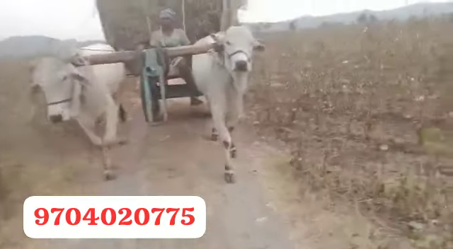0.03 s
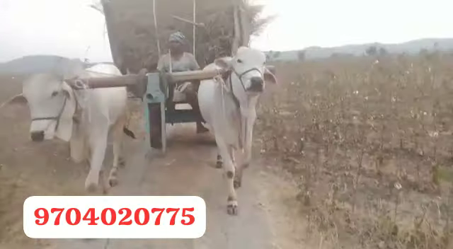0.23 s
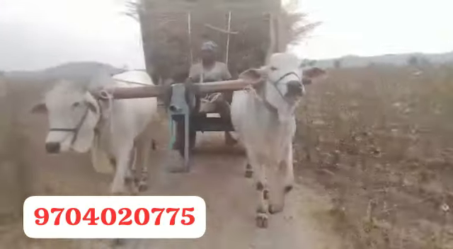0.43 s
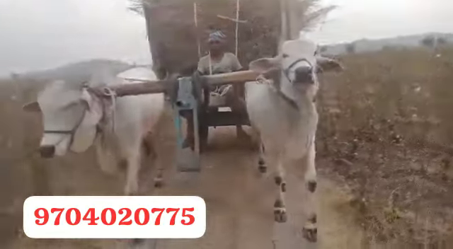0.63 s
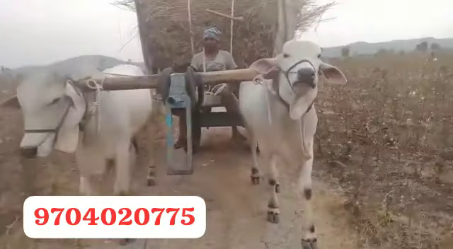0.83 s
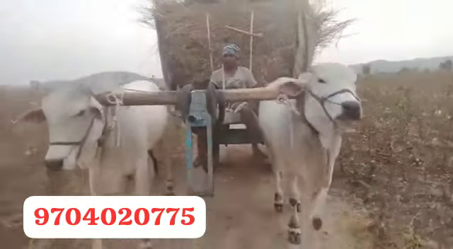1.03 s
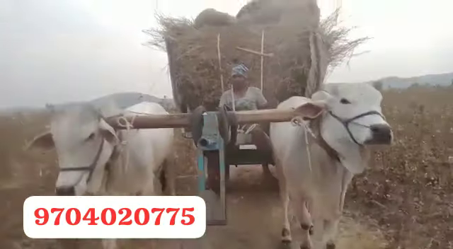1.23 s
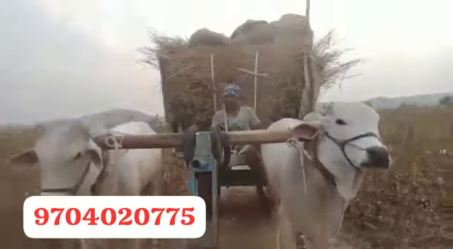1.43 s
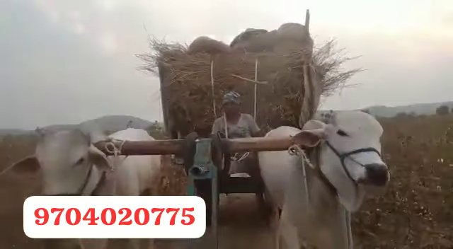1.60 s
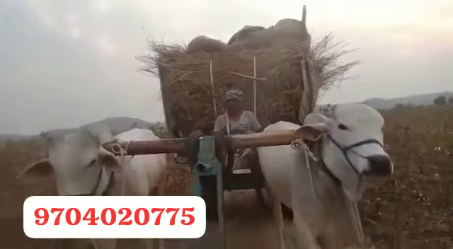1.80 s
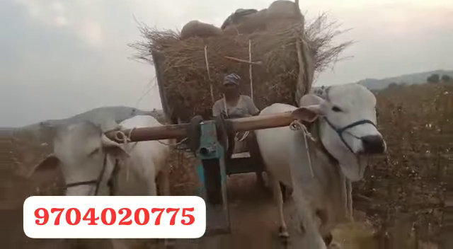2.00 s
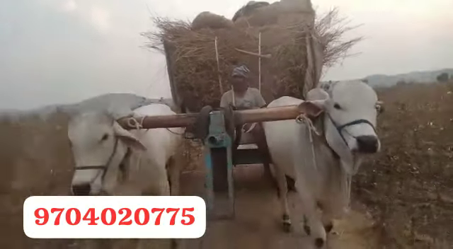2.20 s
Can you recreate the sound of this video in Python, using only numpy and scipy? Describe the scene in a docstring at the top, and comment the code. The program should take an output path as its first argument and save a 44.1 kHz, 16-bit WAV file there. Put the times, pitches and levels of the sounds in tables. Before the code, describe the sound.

Two bullocks walk on a dirt track, hooves crunching dry soil and clicking small stones, straw swishing on their cart; from about half a second wind thumps and rumbles loudly on the close microphone, outdoors without echo.

```python
"""Dirt track in the open: two bullocks pull a straw-laden cart close by.
Hooves crunch and scuff as bursts of soil grains; small stones click as short damped tones with noise.
The load hisses as coloured grains, the harness clinks as ringing modes, the cart creaks once in narrow noise.
Gusts buffet the microphone, loudest of all: a lumpy low rumble of banded noise plus single pressure pulses."""
import sys
import numpy as np
from scipy import signal
from scipy.fft import rfft, irfft
from scipy.io import wavfile
from scipy.ndimage import uniform_filter1d

SR = 44100
rng = np.random.default_rng(int(sys.argv[2]) if len(sys.argv) > 2 else 0)


def master_out(mix):
    """Clip the mix to full scale and print it as 16-bit PCM to the path in sys.argv[1]."""
    frames = np.transpose(np.atleast_2d(mix))
    ceiling = np.clip(frames, -1, 1)
    pcm = np.round(ceiling * 32767).astype(np.int16)
    wavfile.write(sys.argv[1], SR, pcm)


N = 99313
TIME = np.arange(N) / SR
HZ = np.maximum(np.fft.rfftfreq(N, 1 / SR), 1)


def from_db(db):
    """Decibels to gain."""
    return 10 ** (np.asarray(db) / 20)


def rms_one(x):
    """Scale to unit power."""
    return x / np.sqrt(np.mean(x ** 2) + 1e-20)


def in_time(rows):
    """Each column of a curve, interpolated at every sample."""
    s, *columns = np.transpose(rows)
    return [np.interp(TIME, s, c) for c in columns]


def colour(points):
    """Gain at every frequency from (Hz, dB) points, interpolated over log frequency."""
    hz, db = np.transpose(points)
    return from_db(np.interp(np.log(HZ), np.log(hz), db))


def hump(hz, octaves):
    """Gain of a broad resonance: Gaussian over octaves."""
    return np.exp(-.5 * (np.log2(HZ / hz) / octaves) ** 2)


def shaped(x, gain):
    """Steady excitation with a given colour; rms 1."""
    return rms_one(irfft(rfft(x) * gain, N))


def white():
    """White noise."""
    return rng.standard_normal(N)


def evened(x, seconds, share):
    """Take a share of the slow chance swings out of a noise; rms 1."""
    power = uniform_filter1d(np.abs(signal.hilbert(x)) ** 2, max(int(seconds * SR), 1))
    swing = (np.abs(power) + 1e-9) ** (np.clip(share, 0, 1) / 2)
    return rms_one(x / swing)


def grains(per_s, spread_db):
    """Random clicks of uneven size and either sign."""
    sizes = from_db(spread_db * np.minimum(rng.exponential(1, N), 4))
    signs = rng.choice([-1, 1], N)
    return sizes * signs * (rng.random(N) < per_s / SR)


def blow(s, attack_s, decay_s):
    """Quick linear rise, then exponential decay."""
    age = TIME - s
    rise = np.clip(age / attack_s, 0, 1)
    return rise * np.exp(-np.clip((age - attack_s) / decay_s, 0, 20))


def swell(s, half_s):
    """Bell-shaped rise and fall."""
    return np.exp(-.5 * np.minimum(((TIME - s) / half_s) ** 2, 100))


PORT_LOW_HZ, PORT_SLOPE = 80.6, 4   # bass corner, filter order


def port(hz):
    """Bass roll-off of the microphone: it passes no deep bass."""
    return 1 / np.sqrt(1 + (PORT_LOW_HZ / hz) ** (2 * PORT_SLOPE))


EDDY_STEEPNESS = 1.3   # exponent of the fall with frequency


def eddy(hz, reach_hz):
    """Turbulence spectrum at the port: no deep bass, and a fast fall above its reach."""
    return np.exp(-(hz / reach_hz) ** EDDY_STEEPNESS) * port(hz)


WIND_TRIM_DB, WIND_EVEN_S, WIND_EVENNESS = 1.5, 0.051, 0.89
# Wind on the microphone: [t/s, level before trim/dB, turbulence reach f/Hz]
WIND = [(0, -49.5, 77.6), (.27, -58, 82.2), (.42, -51, 66.3), (.55, -45, 74.8), (.62, -35.5, 165),
        (.72, -30.5, 198), (.85, -33.5, 205), (.96, -32, 148.3), (1.10, -39, 109.7), (1.22, -32.5, 164.4),
        (1.42, -41.5, 107.5), (1.54, -40.5, 167), (1.69, -42.5, 83.7), (1.79, -37.5, 115),
        (1.92, -37, 156.7), (2.09, -32.5, 193.4), (2.25, -32.5, 145)]


def wind():
    """Turbulent rumble summed from third-octave noise bands; a higher reach adds upper bands."""
    level_db, reach_hz = in_time(WIND)
    rumble, power = 0, 0
    for hz in 20 * 2 ** (np.arange(19) / 3):
        gain = eddy(hz, reach_hz) * np.sqrt(hz)   # bandwidth grows with f
        rumble = rumble + gain * shaped(white(), hump(hz, 1 / 6))
        power = power + gain ** 2
    steady = evened(rumble / np.sqrt(power), WIND_EVEN_S, WIND_EVENNESS)
    return from_db(level_db + WIND_TRIM_DB) * steady


AIR_DB = -73
# Still background spectrum: [f/Hz, relative level per Hz/dB]
AIR_COLOUR = [(200, 4), (1000, -20), (15500, -29)]


def air():
    """Still background: steady coloured noise."""
    return from_db(AIR_DB) * shaped(white(), colour(AIR_COLOUR))


RUSTLE_GRAINS_PER_S, RUSTLE_GRAIN_DB = 1500, -0.5
HISS_GRAINS_PER_S, HISS_GRAIN_DB = 2600, -0.5
DRAG_OCTAVES = 0.39
FLUTTER_DB, FLUTTER_HZ = 1.2, 26   # rms depth, centre rate
# Faint rustle of the rolling wheels: [t/s, level before flutter/dB]
RUSTLE = [(0, -64.5), (.55, -60), (.79, -59.5), (.85, -57.5), (.97, -61), (1.42, -58.5), (1.64, -57),
          (1.92, -61), (2.25, -53)]
# Rustle spectrum: [f/Hz, relative level per Hz/dB]
RUSTLE_COLOUR = [(1050, -19), (1500, -1.5), (2100, 4.5), (3300, -5), (4000, -16.5), (4700, -29),
                 (6300, -24), (8500, -41.5), (15000, -57.5)]
# Swishes of dry straw as the load sways: [t/s, level before flutter/dB, half-length/s]
SWISHES = [(.005, -53.5, 0.02), (0.103, -52, 0.043), (0.251, -49, 0.11), (1.13, -51, 0.078),
           (2.053, -55, 0.049), (2.198, -51.5, 0.16)]
# Straw spectrum: [f/Hz, relative level/dB]
HISS_COLOUR = [(300, -15), (700, -12.5), (1500, -2.5), (2100, 4.5), (3700, -10), (4600, -24), (6000, -23),
               (8000, -36.5), (15500, -51)]
# Soft drags over the ground: [t/s, level before flutter/dB, half-length/s, centre f/Hz]
DRAGS = [(0.155, -58, 0.13, 644), (0.51, -54, 0.066, 925), (1.463, -56.5, 0.047, 563)]


def cart():
    """Wheels crunch grit and straw swishes, both as grains; drags are noise bands; all flutter coarsely."""
    rustle_grains = grains(RUSTLE_GRAINS_PER_S, RUSTLE_GRAIN_DB)
    rustle = from_db(in_time(RUSTLE)[0]) * shaped(rustle_grains, colour(RUSTLE_COLOUR))
    sway = np.sqrt(sum((from_db(db) * swell(s, half_s)) ** 2 for s, db, half_s in SWISHES))
    straw = sway * shaped(grains(HISS_GRAINS_PER_S, HISS_GRAIN_DB), colour(HISS_COLOUR))
    out = rustle + straw
    for s, db, half_s, hz in DRAGS:
        out = out + from_db(db) * swell(s, half_s) * shaped(white(), hump(hz, DRAG_OCTAVES))
    flutter_db = FLUTTER_DB * shaped(white(), hump(FLUTTER_HZ, 1.0))
    return out * from_db(flutter_db)


HOOF_RISE_S, HOOF_OCTAVES, HOOF_EVEN_S = .003, 0.39, 0.0026
SOIL_GRAINS_PER_S, SOIL_GRAIN_DB, SOIL_SKIRT_DB = 3000, 4, -19   # skirt: floor beside the hump
# Hooves landing and scuffing: [t/s, level before envelope/dB, centre f/Hz, decay/s, sand re soil/dB]
HOOVES = [(0.079, -37.5, 2530, 0.011, -15.5), (0.286, -44, 1750, 0.022, -8.5),
          (0.6152, -44.5, 1230, .005, -17.5), (0.6254, -38.5, 870, 0.0042, -22.5),
          (0.646, -48.5, 2480, 0.011, -5.5), (0.697, -32.5, 1730, 0.0099, -16),
          (0.715, -44.5, 2100, 0.022, -33), (1.025, -48.5, 2170, 0.0051, -10),
          (1.04, -42.5, 2420, 0.0076, -6), (1.051, -39.5, 1970, 0.0073, -39),
          (1.078, -46.5, 2080, 0.06, -13.5), (1.1152, -39.5, 2400, 0.018, -8.5),
          (1.152, -47.5, 1780, 0.029, -18.5), (1.169, -43.5, 2120, 0.02, -18),
          (1.23, -42, 2000, 0.007, -9.5), (1.286, -46, 1980, 0.036, -17.5),
          (1.302, -44, 1890, 0.0085, -8.5), (1.349, -44, 2940, 0.0047, -11.5),
          (1.505, -43, 1570, 0.018, -8), (1.518, -42, 1760, 0.021, -13.5), (1.552, -46.5, 2070, 0.019, -14),
          (1.6477, -54, 2650, 0.022, -8), (1.779, -41.5, 1810, 0.025, -41), (1.816, -48, 2420, 0.017, -24),
          (1.859, -45.5, 1880, 0.0079, -5.5)]
# Soil spectrum, times each contact's hump: [f/Hz, relative level/dB]
SOIL_TOP = [(700, 11), (3600, 1), (4600, -12.5), (6500, -36), (8500, -32.5), (15000, -34.5)]
# Fine sand spectrum: [f/Hz, relative level per Hz/dB]
SAND = [(2500, 2.5), (4000, 6.5), (4700, -1.5), (6000, -5), (10000, -27), (15500, -23.5)]


def hooves():
    """Each contact crushes a burst of soil grains and throws up a little fine sand."""
    out, top = 0, colour(SOIL_TOP)
    sand = shaped(grains(SOIL_GRAINS_PER_S, SOIL_GRAIN_DB), colour(SAND))
    for s, db, hz, decay_s, sand_db in HOOVES:
        gain = (hump(hz, HOOF_OCTAVES) + from_db(SOIL_SKIRT_DB)) * top
        soil = shaped(grains(SOIL_GRAINS_PER_S, SOIL_GRAIN_DB), gain)
        crunch = evened(soil, HOOF_EVEN_S, 1.0) + from_db(sand_db) * sand
        out = out + from_db(db) * blow(s, HOOF_RISE_S, decay_s) * crunch
    return out


CLINK_S, CLINK_GAP_S, CLINK_ATTACK_S = .0808, 0.0029, 0.00055
CLINK_DB, CLINK_OCTAVES = -40, 0.39   # gain per mode ahead of the band
# Modes of the clinking piece: [f/Hz, decay/s]
CLINK_MODES = [(2540, 0.0028), (2920, .007)]


def clink():
    """A hard piece, probably on the harness, chatters softly three times; each touch rings its modes."""
    rings = 0
    for s in CLINK_S + CLINK_GAP_S * np.arange(3):
        for hz, decay_s in CLINK_MODES:
            tone = np.sin(2 * np.pi * (hz * TIME + rng.random()))
            rings = rings + blow(s, CLINK_ATTACK_S, decay_s) * tone
    band = hump(CLINK_MODES[0][0], CLINK_OCTAVES)
    return from_db(CLINK_DB) * irfft(rfft(rings) * band, N)


BUFFET_TRIM_DB, FRINGE_GAIN, FRINGE_HALF_S = 1, 0.21, 0.0093
THUMP_RING_HZ, THUMP_RING_OCTAVES, THUMP_RING_LIFT = 144, .2, 0.57   # lift: added gain
# Single buffets: [t/s, pulse peak before trim/dB, reach f/Hz]
BUFFETS = [(0.183, -40.5, 107), (0.334, -43, 169), (0.574, -28, 258), (0.607, -23, 185),
           (0.634, -19.5, 307), (0.679, -28, 353), (0.702, -19.5, 167), (0.709, -20.5, 387),
           (0.722, -17.5, 195), (0.732, -18.5, 273), (0.743, -22.5, 360), (0.772, -21.5, 370),
           (0.785, -25, 375), (0.82, -17.5, 203), (0.827, -23.5, 380), (0.843, -22.5, 370),
           (0.878, -21.5, 180), (0.922, -33, 333), (0.936, -24, 142), (0.999, -15, 161),
           (1.051, -22.5, 125), (1.163, -22.5, 196), (1.213, -23.5, 157), (1.248, -19.5, 194),
           (1.29, -21.5, 213), (1.312, -18, 155), (1.372, -21.5, 157), (1.509, -31, 235), (1.598, -28, 137),
           (1.752, -25.5, 158), (1.946, -28, 377), (1.962, -21.5, 222), (1.986, -19.5, 275),
           (2.022, -21.5, 170), (2.062, -23, 290), (2.078, -17, 275), (2.097, -24, 240),
           (2.122, -17.5, 184), (2.163, -21.5, 200), (2.177, -19, 166), (2.2, -21, 284), (2.21, -24.5, 354)]


def buffets():
    """Single eddies thump on the port: a short pressure pulse each, ringing a few cycles, with a noisy fringe."""
    half = N // 2
    out = np.zeros(2 * N)   # padded by half at the front
    ring = 1 + THUMP_RING_LIFT * hump(THUMP_RING_HZ, THUMP_RING_OCTAVES)
    for s, db, reach_hz in BUFFETS:
        gain = HZ * np.exp(-(HZ / reach_hz) ** 2) * port(HZ) * ring
        thump = np.roll(irfft(gain, N), half)   # pulse centred in its buffer
        start = int(np.clip(s * SR, 0, N))
        out[start:start + N] += from_db(db) * thump / thump.max()
        fringe = swell(s, FRINGE_HALF_S) * shaped(white(), gain)
        out[half:half + N] += from_db(db) * FRINGE_GAIN * fringe
    return from_db(BUFFET_TRIM_DB) * out[half:half + N]


STONE_CYCLES, STONE_OCTAVES, STONE_CRACK_GAIN, STONE_ATTACK_S = 3.2, 0.41, 0.52, 0.00055
# Small stones clicking: [t/s, peak before resonances/dB, f/Hz]
STONES = [(0.207, -35.5, 2180), (0.7383, -32.5, 2500), (1.1161, -28.5, 2700), (1.118, -48, 8800),
          (1.135, -33, 2160), (1.185, -44, 5620), (1.216, -34, 1380), (1.297, -32.5, 1940),
          (1.47, -52, 5700), (1.521, -39, 1830), (1.558, -35, 1870), (1.588, -51.5, 5600),
          (1.763, -33.5, 2450), (1.845, -30.5, 918), (1.863, -54, 5620)]


def stones():
    """Dead clicks: a damped tone of a few cycles mixed with a crack of noise."""
    out = 0
    for s, db, hz in STONES:
        tone = np.sin(2 * np.pi * hz * (TIME - s))
        crack = STONE_CRACK_GAIN * shaped(white(), hump(hz, STONE_OCTAVES))
        click = blow(s, STONE_ATTACK_S, STONE_CYCLES / hz / 2) * (tone + crack)
        out = out + from_db(db) * click / (np.abs(click).max() + 1e-9)
    return out


CREAK_S, CREAK_HALF_S, CREAK_WIDTH_HZ, CREAK_EVENNESS = 2.102, .02, 16, 0.79
# Modes of the wooden joint: [f/Hz, level/dB]
CREAK_MODES = [(620, -44), (861, -56)]


def creak():
    """A wooden joint of the cart rubs unevenly and sings briefly: narrow noise at a few modes."""
    modes = 0
    for hz, db in CREAK_MODES:
        peak = 1 / (1 + ((HZ - hz) / CREAK_WIDTH_HZ) ** 2)
        modes = modes + from_db(db) * evened(shaped(white(), peak), CREAK_HALF_S, CREAK_EVENNESS)
    return swell(CREAK_S, CREAK_HALF_S) * modes


RING_WIDTH_HZ = 28   # half-width
# Narrow resonances on hooves, stones and cart: [f/Hz, lift/dB]
RINGS = [(1380, 2), (1600, 2.5), (2930, 3), (3517, 4.5)]


def ringing(x):
    """Lift each narrow resonance; it rings on briefly after a knock."""
    gain = 1 + sum((from_db(db) - 1) / (1 + 1j * (HZ - hz) / RING_WIDTH_HZ) for hz, db in RINGS)
    return irfft(rfft(x) * gain, N)


def scene():
    """Everything at one microphone, with no echo in the open."""
    ground = ringing(cart() + hooves() + stones())
    return (wind() + air() + ground + clink() + buffets() + creak())[None]


CUTOFF_HZ = 15850


def record(dry):
    """Steep low-pass."""
    return irfft(rfft(dry) / np.sqrt(1 + (HZ / CUTOFF_HZ) ** 200), N)


dry = scene()
out = record(dry)
master_out(out)
```